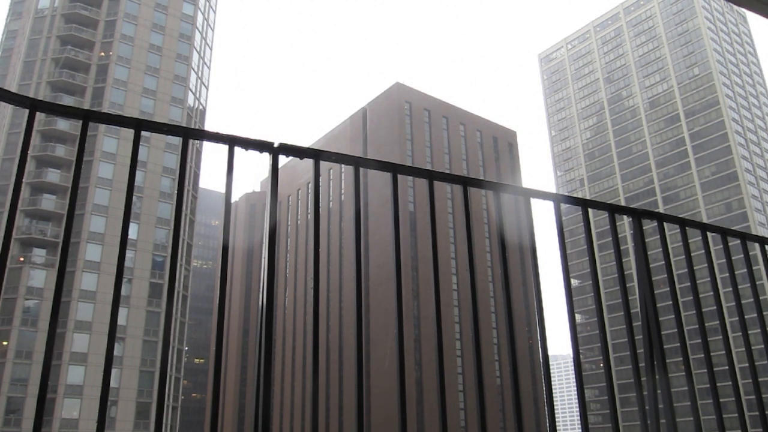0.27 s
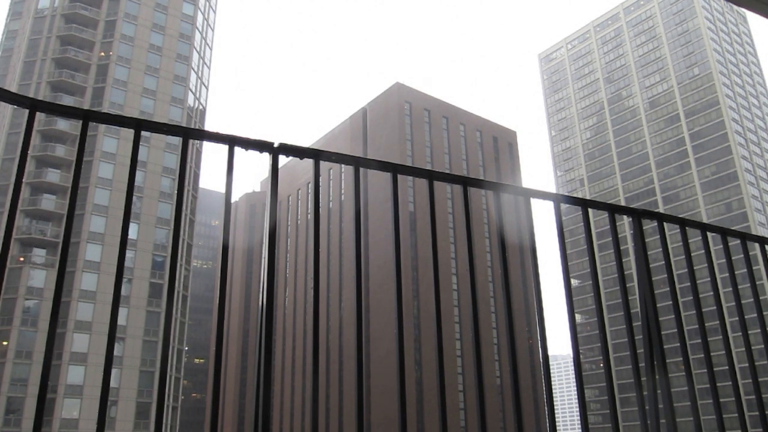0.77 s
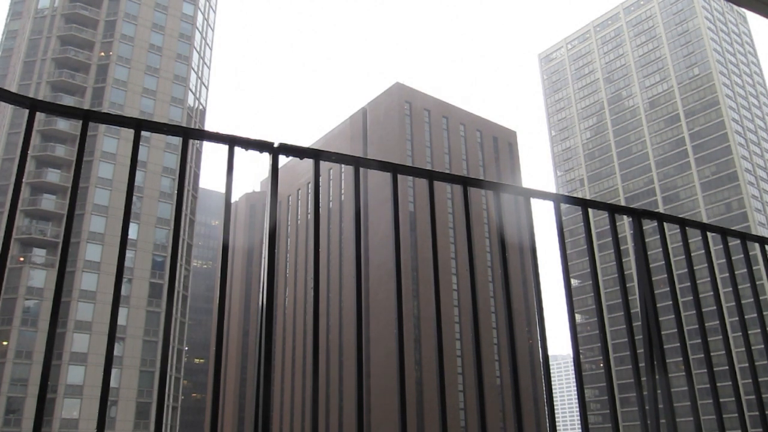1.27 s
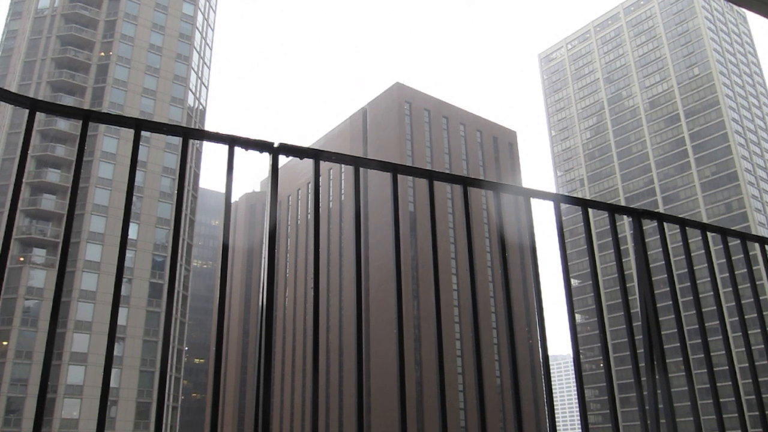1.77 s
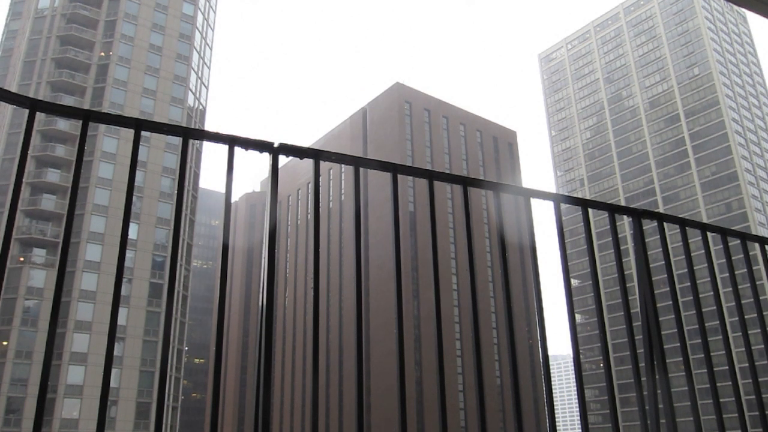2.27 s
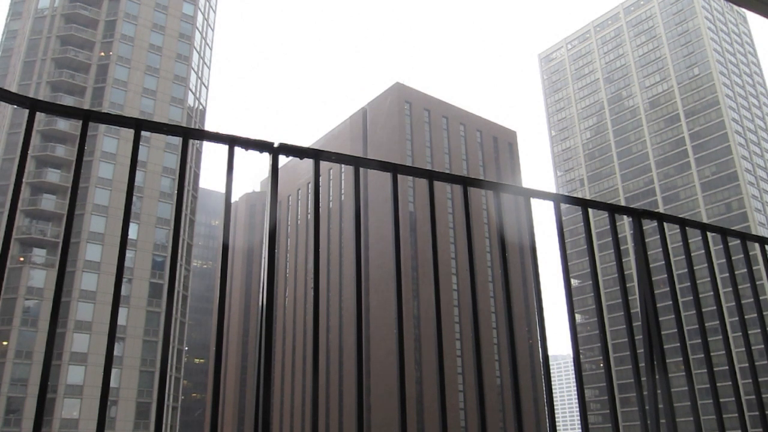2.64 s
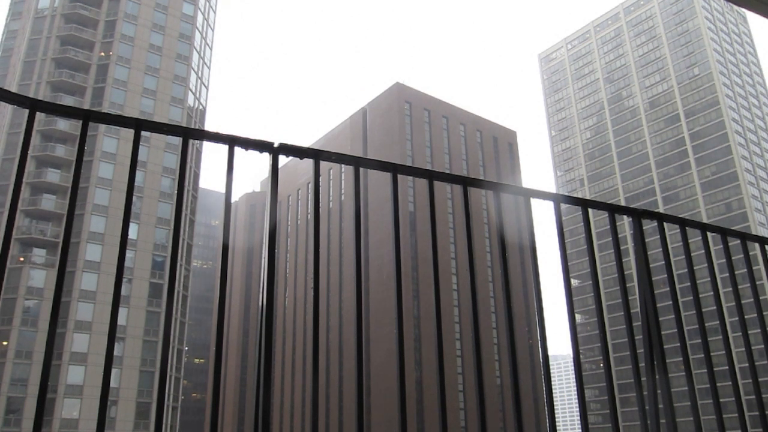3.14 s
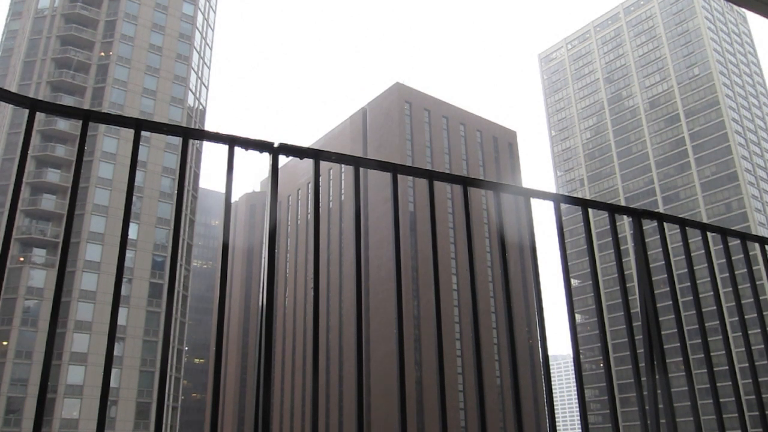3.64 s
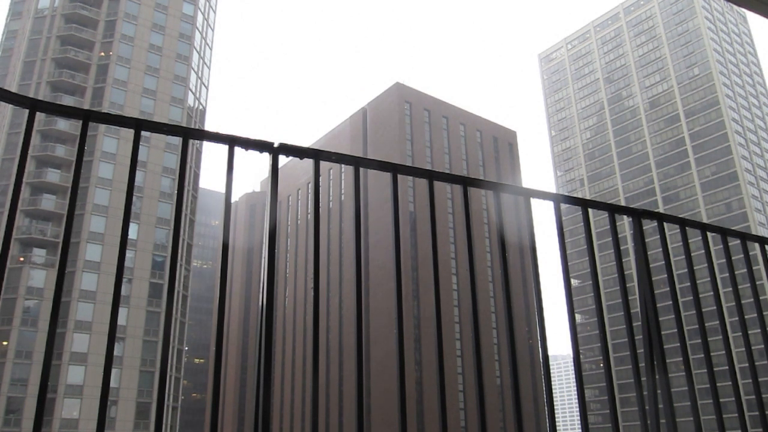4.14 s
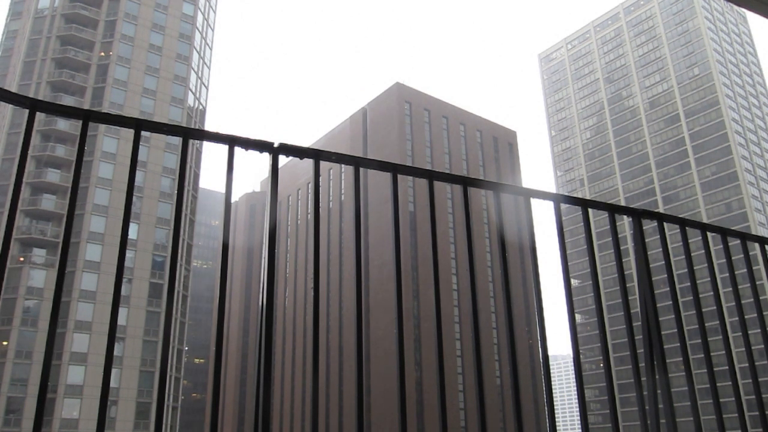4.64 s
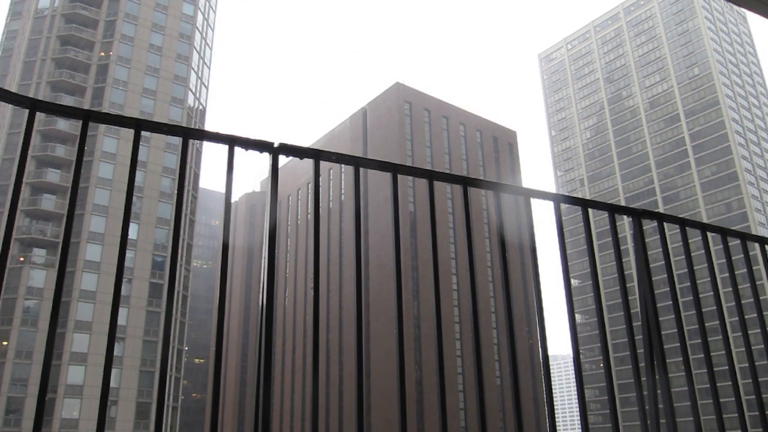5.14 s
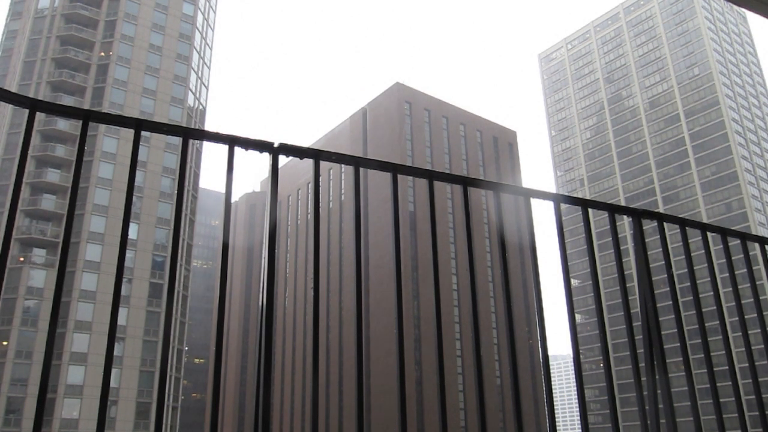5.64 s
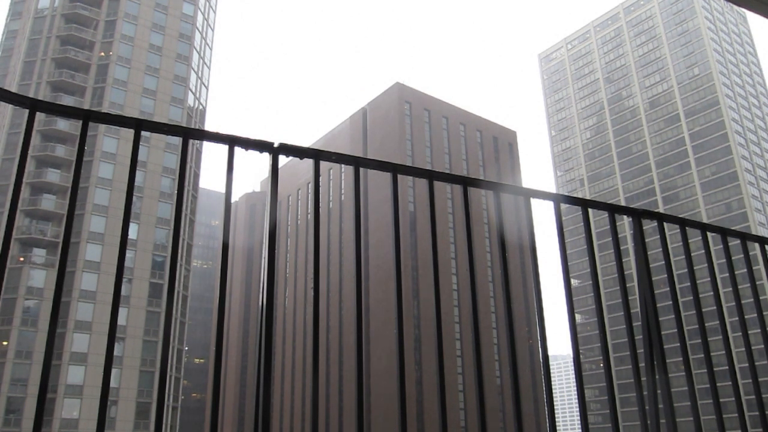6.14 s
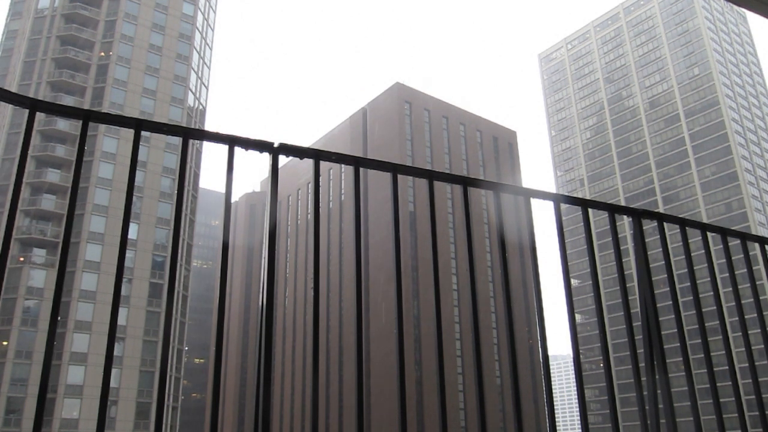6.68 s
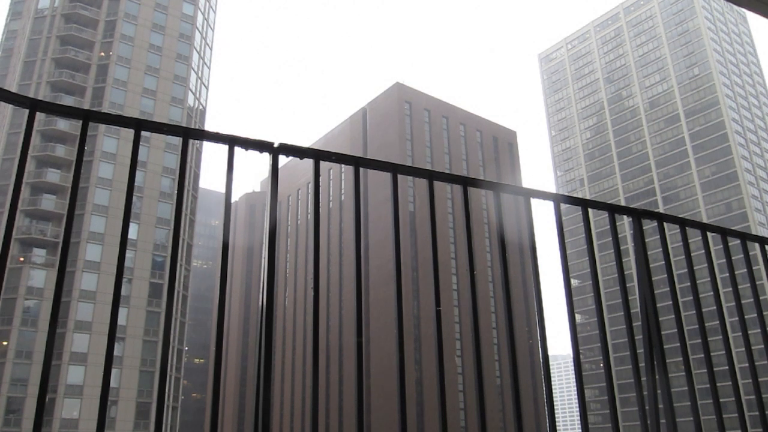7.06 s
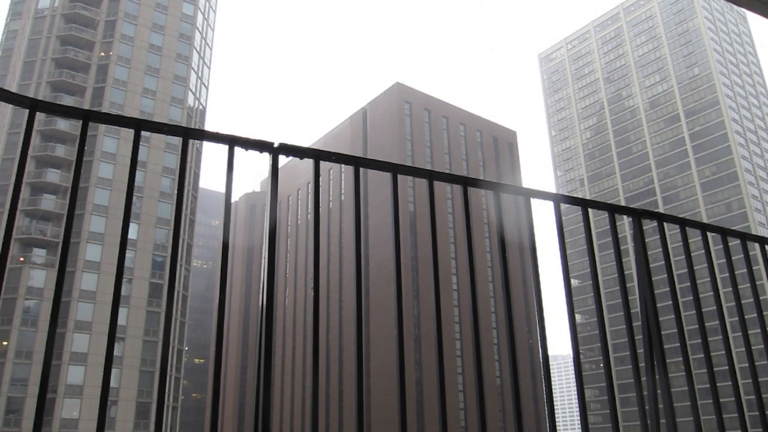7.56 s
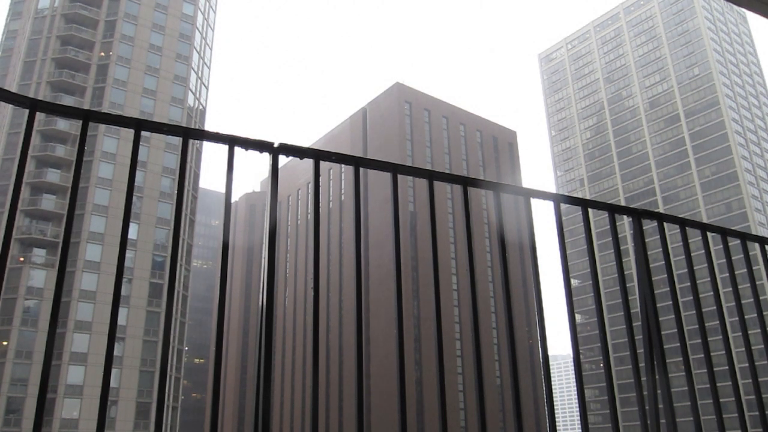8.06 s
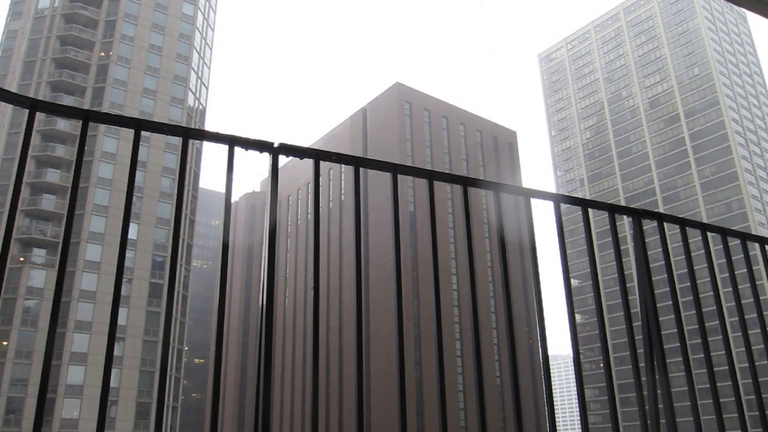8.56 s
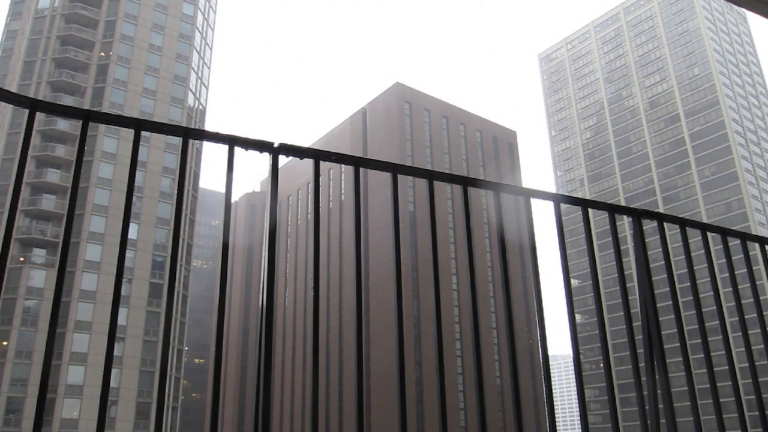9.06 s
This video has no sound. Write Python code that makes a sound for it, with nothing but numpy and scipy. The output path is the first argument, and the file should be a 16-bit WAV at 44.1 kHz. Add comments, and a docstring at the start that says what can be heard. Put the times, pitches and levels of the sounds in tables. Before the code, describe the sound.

Crisp raindrops patter near the microphone until sharp nearby thunder tears open, booms off tall facades, fades, and the rain returns.

```python
"""A balcony among towers in steady rain; single drops tick close to the camera's two microphones.
Lightning strikes nearby: dense trains of shocks make a clap, then a long roll repeated by the facades,
its crackle duller as farther parts of the bolt arrive. Behind it lie filtered-noise traffic, a wash of clicks
for far drops, a fan, thin squeals and air brushing the microphones.
The camera's gain control pushes the rain down at the clap and lets it back over several seconds."""
import sys
import numpy as np
from scipy import signal
from scipy.fft import rfft, irfft
from scipy.io import wavfile

SR = 44100
rng = np.random.default_rng(int(sys.argv[2]) if len(sys.argv) > 2 else 0)


def log_audio(samples):
    """Write samples as a 16-bit WAV file to the path given in sys.argv[1]."""
    # one column per channel
    frames = np.atleast_2d(samples).T
    # limit to full scale, then quantise
    limited = np.clip(frames, -1, 1)
    pcm = np.round(limited * 32767).astype(np.int16)
    wavfile.write(sys.argv[1], SR, pcm)


N = 411012
TIME, FREQS = np.arange(N) / SR, np.fft.rfftfreq(N, 1 / SR)
SLOW = np.arange(0, N / SR + .002, .002)  # coarse time grid in seconds for slow level curves


def amp(db):
    """Decibels to gain."""
    return 10 ** (np.asarray(db) / 20)


def unit(x):
    """Scales to rms 1."""
    return x / np.sqrt(np.mean(x ** 2) + 1e-20)


def read(points, hz=FREQS):
    """A spectrum read on a log-frequency axis."""
    f, value = np.transpose(points)
    return np.interp(np.log(hz + 1), np.log(f), value)


def add(mix, s, sound):
    """Mixes a sound in at time s."""
    part = mix[:, max(round(s * SR), 0):][:, :sound.shape[-1]]
    part += sound[..., :part.shape[1]]


def drift(rate):
    """Slow chance of rms 1: noise whose spectrum falls steeply above rate in Hz."""
    hz = np.fft.rfftfreq(len(SLOW), SLOW[1])
    spectrum = rfft(rng.standard_normal(len(SLOW))) / (1 + (hz / rate) ** 4)
    return np.interp(TIME, SLOW, unit(irfft(spectrum, len(SLOW))))


def swells(rows):
    """Summed power of bell-shaped swells, each given as (s, half length s, dB)."""
    power = sum(amp(db) ** 2 * np.exp(-((SLOW - s) / half_s) ** 2) for s, half_s, db in rows)
    return np.interp(TIME, SLOW, power)


def clicks(per_s, spread_db):
    """Two random trains of clicks, most small and a few large."""
    size = amp(spread_db * np.minimum(rng.exponential(1, (2, N)), 4))
    sign = rng.choice([-1, 1], (2, N))
    return unit(size * sign * (rng.random((2, N)) < per_s / SR))


def colour(pair, gain, likeness):
    """Filters two unrelated signals and blends them into left and right."""
    common, apart = rfft(pair) * gain
    same = np.clip(read(likeness), -1, 1)
    mid = common * np.sqrt((1 + same) / 2)
    side = apart * np.sqrt((1 - same) / 2)
    return irfft(np.array([mid + side, mid - side]), N)


# How alike the thunder reaches the two microphones. Each row: frequency in Hz, left-right likeness.
THUNDER_LIKENESS = [(25, .6), (60, 1), (130, 0.99), (290, 0.99), (640, 0.92), (1400, 0.7), (3100, 0.14),
                    (6800, 0.11)]


def shocks(level_db, spectrum, per_s, spread_db):
    """Each kink of the bolt sends one shock; they arrive as a dense random train."""
    train = clicks(per_s, spread_db) * amp(level_db)
    return colour(train, unit(amp(read(spectrum))), THUNDER_LIKENESS)


STRIKE_S = 2.415  # the first shock arrives
# Peals, where a whole branch of the bolt is heard together. Each row: centre in seconds,
# half length in seconds, level in dB in the register of like brightness, brightness (0 boom, 0.5 roar, 1.5 crackle).
PEALS = [(2.661, 0.024, -1, 0.25), (2.74, 0.035, 1, 0.63), (2.803, 0.019, 2, 0.47),
         (2.918, 0.049, 3.5, 0.27), (3.166, 0.026, 3, 0.38), (3.3, 0.029, 3, 0.26),
         (3.383, 0.041, 4.5, 0.46), (3.675, 0.029, 3.5, 0.35), (3.852, 0.063, -1, 0.44),
         (4.024, 0.026, 5, 0.61), (4.28, 0.024, 1, 0.37), (4.553, 0.046, -12, 0.64),
         (4.674, .03, -1.5, 0.34), (4.787, 0.028, 1.5, 0.22), (5.896, 0.025, -2, 0.27),
         (6.066, 0.018, -5, 0), (6.18, 0.34, -9.5, 0.81), (8.926, 0.14, -20, 0.84),
         (9.117, 0.12, -10, 0.35), (9.31, 0.053, -11.5, 0.32)]


def roll_db(full_db, fade_db_per_s, far_db, brightness):
    """Level of one register: more of the bolt is heard, it holds, fades to far echoes; peals add to it."""
    build_s, build_power, hold_s = 0.59, 1.71, 1.64
    focus_db = 68.5  # a peal loses this in a register one whole step of brightness away
    age = TIME - STRIKE_S
    build = np.clip(age / build_s, 0, 1) ** build_power
    body = amp(full_db - fade_db_per_s * np.maximum(age - build_s - hold_s, 0))
    peals = swells([(s, half_s, db - focus_db * (bright - brightness) ** 2)
                    for s, half_s, db, bright in PEALS])
    return 10 * np.log10(build ** 2 * (body ** 2 + amp(far_db) ** 2) + peals + 1e-12)


# The three registers of the shocks. Each row: frequency in Hz, relative level in dB.
BOOM = [(20, -39), (45, -12), (62, -9.5), (85, 0.5), (150, -0.5), (200, -7), (330, -15.5), (700, -88)]
ROAR = [(60, -58), (140, -5.5), (200, 0.5), (275, 2), (460, -2), (620, -11.5), (850, -18), (2000, -32),
        (4000, -99)]
CRACKLE = [(250, -29), (550, 5), (800, -1), (1100, -0.5), (1550, -3), (2200, -3), (3500, -7), (5500, -14.5),
           (8000, -26), (16000, -49)]
# Echoes from the towers' facades. Each row: delay in seconds, level in dB against the direct roll.
FACADES = [(.047, -10.5), (0.117, -9), (.205, -27), (.34, -18.5)]


def thunder():
    """Boom, roar and crackle repeated by the towers; crossing more air dulls the later crackle, up to a limit."""
    boom_db = roll_db(full_db=-6.5, fade_db_per_s=5.5, far_db=-26, brightness=0)
    roar_db = roll_db(full_db=-2.5, fade_db_per_s=5.5, far_db=-24.5, brightness=.5)
    crackle_db = roll_db(full_db=-4.5, fade_db_per_s=5.5, far_db=-53, brightness=1.5)
    boom = shocks(boom_db, BOOM, per_s=500, spread_db=2.0)
    roar = shocks(roar_db, ROAR, per_s=1100, spread_db=1.5)
    crackle = shocks(crackle_db + 1.25 * drift(21), CRACKLE, per_s=4000, spread_db=2.0)

    air_from_s, air_settle_s = 2.51, 3.23
    air_loss_db, air_at_hz = 26.5, 3460  # the final loss, at this frequency
    hz, t, z = signal.stft(crackle, SR, nperseg=512)
    far = 1 - np.exp(-(np.maximum(t, STRIKE_S) - air_from_s) / air_settle_s)
    loss_db = air_loss_db * far * (hz[:, None] / air_at_hz) ** 1.155
    dulled = signal.istft(z * amp(-loss_db), SR, nperseg=512)[1][:, :N]

    direct = boom + roar + dulled
    out = direct.copy()
    for delay, db in FACADES:
        add(out, delay, amp(db) * direct)
    return out


# Single heavy shocks felt as low thumps. Each row: start in seconds, peak in dB, pitch in Hz.
THUMPS = [(2.529, -8, 66.6), (2.559, -5.5, 145), (2.593, -1.5, 125), (3.152, 7, 105), (3.275, 1, 85),
          (3.312, 5, 170)]


def thumps(cycles_to_peak=0.75):
    """A heavy shock swells within one swing and dies in a few more."""
    out, t = np.zeros((2, N)), np.arange(6000) / SR
    for s, db, hz in THUMPS:
        age = t * hz / cycles_to_peak
        swell = (age * np.exp(1 - age)) ** 2
        add(out, s, amp(db) * swell * np.sin(2 * np.pi * hz * t))
    return out


# Stretches of the bolt whose shocks arrive all at once. Each row: centre in seconds, level in dB,
# centre frequency in Hz, half width in natural-log frequency, half length in seconds.
CRACKS = [(2.57, -20, 1700, .5, 0.0055), (2.598, -12.5, 1650, 0.56, 0.008),
          (2.621, -13, 1940, 0.73, 0.0075), (2.641, -14.5, 1840, 0.5, 0.0086),
          (2.659, -3, 390, 0.35, 0.011), (2.675, -16, 2500, 0.55, .024), (2.702, -5, 1390, 0.58, .008),
          (2.725, -3.5, 2300, 0.59, 0.0065), (2.731, 3.5, 480, 0.21, 0.0083),
          (2.737, -4.5, 2190, 0.57, 0.0055), (2.76, -10, 1900, 0.42, .004),
          (2.785, -9.5, 2200, 0.6, 0.0073), (2.803, 2, 370, 0.28, .009), (2.849, -2, 497, 0.19, .007),
          (2.887, -1, 417, 0.31, .012), (3.397, -6, 1070, 0.28, 0.012), (3.411, 3.5, 420, 0.33, 0.0068),
          (3.977, 2, 230, 0.24, 0.0082), (4.848, -2, 930, 0.24, .012), (8.835, -10.5, 338, 0.34, .012),
          (9.044, -5, 335, .2, .011)]


def cracks(per_s=2000, fizz=0.47, air_hz=6600):
    """Tight volleys of separate shocks tear out of the roll, each in its own band under a bell."""
    out = np.zeros((2, N))
    air = signal.butter(4, air_hz, fs=SR, output="sos")
    for s, db, hz, width, half_s in CRACKS:
        t = np.arange(-3 * half_s, 3 * half_s, 1 / SR)
        fronts = rng.standard_normal(len(t)) * (rng.random(len(t)) < per_s / SR)
        volley = unit(fronts) + fizz * rng.laplace(size=(2, len(t)))
        edges = [hz * np.exp(-width), hz * np.exp(width)]
        band = signal.butter(2, edges, "band", fs=SR, output="sos")
        bell = np.exp(-(t / half_s) ** 2 / 2)
        burst = unit(signal.sosfilt(np.vstack([band, air]), volley) * bell)
        add(out, s - 3 * half_s, amp(db) * burst * np.sqrt(np.mean(bell ** 2)))
    return out


def tick(hz, cycles=0.35, rattle_db=-13, rattle_s=0.0021, bounce=0.49):
    """A drop's impact: a brief swing that reaches one microphone first, then a moment of wet rattle."""
    lag = rng.uniform(-0.000098, 0.0001)  # seconds between the microphones
    t = np.arange(320) / SR - .0003
    since = np.maximum(t + np.array([[lag], [-lag]]) / 2, 0)
    age = since * hz / cycles
    impact = age * np.exp(1 - age) * np.sin(2 * np.pi * cycles * age)
    # a slightly later bounce off the wet surface gives each drop its own colour
    impact = impact + bounce * np.roll(impact, round(rng.uniform(1, 2.6) * SR / hz), axis=1)
    rattle_edges = np.clip([hz * 0.92, hz * 2.8], 500, SR * .45)
    band = signal.butter(1, rattle_edges, "band", fs=SR, output="sos")
    rattle = unit(signal.sosfilt(band, rng.standard_normal(age.shape)))
    rattle = rattle * (1 - np.exp(-age)) * np.exp(-since / rattle_s)
    # small drops have no body, big soft ones little edge
    thin_edges = np.clip([hz * 0.4, hz * 4.2], 1500, SR * .47)
    thin = signal.butter(2, thin_edges, "band", fs=SR, output="sos")
    return signal.sosfilt(thin, impact + amp(rattle_db) * rattle)


def drop(hz, splash_db, splash_s=0.0072, body_db=-21, body_s=0.0011, count=7):
    """A big drop ticks and briefly rings the spot it hits; the droplets it throws land just after, weaker with delay."""
    out, t = np.zeros((2, 4096)), np.arange(1024) / SR
    add(out, 0, tick(hz))
    for pitch, ring in rng.uniform(0.693, 1.21, (2, 2)):
        decay = np.exp(-t / (body_s * ring))
        add(out, 0, amp(body_db) * decay * np.sin(2 * np.pi * hz * pitch * t))
    for delay, scatter, pitch in rng.random((count, 3)):
        droplet = tick(min(hz * (.7 + .9 * pitch), 13000))
        level_db = splash_db - 1.8 * delay - 2.2 * scatter
        add(out, 3 * splash_s * delay ** 1.4, amp(level_db) * droplet)
    return out


# The biggest drops, close by. Each row: start in seconds, level in dB, pitch in Hz,
# splash in dB against the drop.
NEAR_DROPS = [(0.07, -5, 4620, -18), (.3335, -14, 11000, -18), (0.366, 2.5, 9000, -24),
              (.5855, -9, 10500, -16), (0.677, -4.5, 5050, -16), (.8825, -4.5, 7700, -20),
              (1.0893, -4.5, 5900, -20), (1.188, -5, 7700, -21), (1.265, -8, 10000, -18),
              (1.562, -9.5, 4270, -16), (1.61, -4, 11500, -16), (1.6803, -1.5, 9500, -18),
              (1.7445, -8, 6500, -12), (1.7555, -8.5, 4670, -17), (1.833, -6.5, 5600, -20),
              (1.843, -5, 6900, -18), (2.0285, -10, 11000, -18), (2.044, -9, 6450, -15),
              (2.1097, -2, 5500, -13), (2.1552, -1.5, 6900, -19), (2.209, -8, 10500, -18),
              (2.224, -6, 9900, -18), (2.249, 3, 7700, -22), (2.331, -4.5, 5500, -21),
              (2.3562, -7, 6030, -20), (2.429, -6, 9550, -16), (2.443, 0, 10100, -16),
              (2.526, -8, 5970, -12), (2.6161, 3, 12700, -14), (3.1906, -5, 11000, -20),
              (4.1255, -2, 11000, -18), (4.801, 0, 12000, -22), (4.908, -2, 10500, -15),
              (5.0056, 1, 11000, -18), (5.0206, 0.5, 5800, -8), (5.143, -10, 8500, -18),
              (5.291, -1.5, 5500, -9), (5.4125, -5, 12500, -22), (5.461, -3, 6500, -12),
              (5.508, -6, 12500, -20), (5.5243, -2.5, 4627, -18), (5.6805, -13, 12500, -20),
              (5.761, -2, 6700, -16), (5.9135, -12, 10000, -18), (5.936, -5, 6000, -16),
              (5.9777, 2, 3400, -17), (6.0004, -2, 4200, -18), (6.0084, 2.5, 5200, -17),
              (6.209, -2, 8100, -17), (6.32, -9, 4400, -15), (6.493, -1, 8870, -18), (6.5976, 4, 9980, -19),
              (6.6499, -2, 10500, -18), (6.661, 2, 4030, -20), (6.7606, -1.5, 9000, -16),
              (6.796, -2, 5850, -6), (6.8262, -0.5, 6280, -9), (6.8736, 3, 6560, -19),
              (6.9234, 1, 10000, -18), (6.931, 0, 4140, -11), (6.9405, -1, 3700, -12),
              (6.9537, 0, 4400, -12), (6.97, -1, 8600, -18), (7.016, 1, 11000, -22),
              (7.048, -7, 10500, -14), (7.1237, 0.5, 7200, -19), (7.167, -4, 9000, -18),
              (7.1723, 2, 7840, -18), (7.2121, -4.5, 5050, -18), (7.263, -4.5, 5200, -13),
              (7.332, -7, 12000, -19), (7.4083, -2, 4630, -18), (7.4518, -8, 6000, -18),
              (7.655, -2, 11000, -16), (7.676, -11, 4600, -10), (8.0133, -2, 5500, -16),
              (8.128, -10, 10000, -18), (8.151, -6, 7500, -19), (8.551, -10.5, 9000, -18),
              (8.657, -1.5, 7660, -22), (9.148, -5, 9000, -18), (9.266, -9, 8050, -18)]


def near_hits():
    """Big drops landing beside the camera."""
    out = np.zeros((2, N))
    for s, db, hz, splash_db in NEAR_DROPS:
        add(out, s, amp(db) * drop(hz, splash_db))
    return out


# Gusts throw spray onto the balcony. Each row: centre in seconds, half length in seconds, added patter in dB.
GUSTS = [(.52, 0.14, -34), (1.25, 0.089, -44), (1.72, 0.12, -31), (2.2, 0.17, -36), (2.54, 0.013, -27),
         (5.2, 0.5, -40), (6.1, 0.43, -31.5), (6.95, 0.21, -29), (8.2, 0.19, -45)]


def patter(count=90, steady_db=-39):
    """Small drops of many pitches on the rail and floor, coming in clumps and gusts."""
    clumps = amp(2 * drift(14))
    hits = clicks(400, 2.7)[0] * clumps
    kind = rng.integers(0, count, N)
    shapes = [tick(hz) * np.sqrt(hz) for hz in np.geomspace(4800, 12000, count)]
    out = np.zeros((2, N))
    for at in np.flatnonzero(hits):
        add(out, at / SR, hits[at] * shapes[kind[at]])
    return unit(out) * np.sqrt(amp(steady_db) ** 2 + swells(GUSTS))


def slap(x, delay_s=.0098, slap_db=-10, smear_s=.0009):
    """The balcony's ceiling returns every drop once, a little smeared."""
    t = np.arange(200) / SR
    smear = rng.standard_normal((2, len(t))) * np.exp(-t / smear_s)
    smear = smear / np.linalg.norm(smear, axis=1, keepdims=True)
    out = x.copy()
    add(out, delay_s, amp(slap_db) * signal.oaconvolve(x, smear, axes=1))
    return out


def balcony(x, wet_db=-11, fade_s=0.0083):
    """Floor, wall and ceiling smear each drop into a short hiss: noise that follows the drops' power."""
    r = np.exp(-1 / (fade_s * SR))
    power = signal.lfilter([1 - r], [1, -r], (x ** 2).mean(0))
    band = signal.butter(2, [3200, 12500], "band", fs=SR, output="sos")
    hiss = unit(signal.sosfilt(band, rng.standard_normal((2, N))))
    return x + amp(wet_db) * np.sqrt(power) * hiss


# Soft knocks on the camera. Each row: time in seconds, level of the push in dB.
KNOCKS = [(0.156, -4.5), (.434, -8)]


def knocks():
    """Each dull knock pushes the camera's body once; it swings back and rings briefly."""
    out, t = np.zeros((2, N)), np.arange(-256, 3000) / SR
    push = np.exp(-(t / .0008) ** 2) - .5 * np.exp(-((t - .0018) / .0012) ** 2)
    ring = 0.15 * (t > 0) * np.exp(-t / 0.02) * np.sin(2 * np.pi * 250 * t)
    for s, db in KNOCKS:
        add(out, s + t[0], amp(db) * (push + ring))
    return out


# City drone and rain wash beyond the balcony. Each row: frequency in Hz, dB per Hz before the level moves.
CITY = [(10, -55), (22, -62), (50, -50), (80, -43.5), (150, -48.5), (200, -49), (280, -51), (450, -60),
        (700, -68.5), (1500, -66.5), (5000, -100)]
WASH = [(200, -55.5), (600, -64), (1100, -68.5), (2300, -68.5), (3500, -70), (6500, -76), (10500, -77),
        (13000, -85), (16000, -113)]
# Level of city and wash, dipping briefly near the start. Each row: time in seconds, level in dB.
STREET_LEVEL = [(0, 1.5), (.14, 1), (.27, -0.5), (.41, -4.5), (.65, -1.5), (1.6, 0), (9.3, -2.5)]
# How alike they reach the two microphones. Each row: frequency in Hz, left-right likeness.
STREET_LIKENESS = [(25, 0.42), (60, 1), (130, 0.98), (290, 0.95), (640, 0.88), (1400, 0.69),
                   (3100, -0.0084), (6800, -0.5), (15000, 0.28)]


def street():
    """Traffic drone as noise, the wash of countless far drops as clicks, and a throbbing fan as a sine."""
    level_db = np.interp(TIME, *np.transpose(STREET_LEVEL))
    per_hz = np.sqrt(SR / 2)  # turns dB per Hz into filter gain
    city = colour(rng.standard_normal((2, N)), per_hz * amp(read(CITY)), STREET_LIKENESS)
    city = city * amp(level_db - 3)
    wash = colour(clicks(14000, 3.5), per_hz * amp(read(WASH)), STREET_LIKENESS)
    wash = wash * amp(level_db + 0.65 * drift(23.0))

    fan_hz, fan_db = 37.5, -32.5  # a big ventilation fan, mean level as rms
    ports = np.array([[.25], [-.25]])  # its standing wave meets the two microphones slightly out of step
    fan_level = amp(fan_db + 1.1 * drift(3))
    fan = fan_level * np.sin(2 * np.pi * fan_hz * TIME + 0.23 * drift(2.5) + ports)
    return city + wash + np.sqrt(2) * fan


# Thin distant squeals, perhaps brakes. Each row: centre in seconds, half length in seconds,
# mean pitch in Hz, level in dB rms before the flutter.
SQUEALS = [(8.88, .04, 2172, -47), (9.08, .065, 2185, -44), (9.3, .03, 2185, -47.5),
           (8.99, 0.05, 1872, -45), (9.25, .045, 1872, -43.5)]


def squeal(waver=0.003, flutter_db=1.8):
    """Thin wavering tones swell and fade down the street."""
    turn = 2 * np.pi * np.cumsum(1 + waver * drift(14.5)) / SR  # phase of a 1 Hz tone
    out = np.zeros(N)
    for s, half_s, hz, db in SQUEALS:
        level = np.sqrt(2 * swells([(s, half_s, db)])) * amp(flutter_db * drift(25))
        out += level * np.sin(hz * turn)
    return out


# Air brushing each microphone separately. Each row: frequency in Hz, dB per Hz before the flutter.
BREEZE = [(15, -86), (30, -66), (48, -60), (62, -62), (90, -55), (150, -58.5), (400, -86), (2000, -130)]


def breeze():
    """A lumpy low flutter, practically unrelated between the two microphones."""
    gain = np.sqrt(SR / 2) * amp(read(BREEZE))
    flutter = colour(rng.standard_normal((2, N)), gain, [(1, 0.00029)])
    return flutter * amp(1.4 * drift(3.3))


def scene():
    """Everything outdoors, a little stronger on the left, the drops more so."""
    rain = balcony(slap(patter() + near_hits())) * amp([[.3], [-.3]])
    storm = thunder() + thumps() + cracks()
    background = street() + squeal() + breeze()
    return (storm + background + knocks() + rain) * amp([[.4], [-.4]])


def lagged(v, seconds):
    """One-pole smoothing."""
    r = np.exp(-1 / (seconds * SR))
    return signal.lfilter([1 - r], [1, -r], v)


def gain_control(x, threshold_db=-14.5, ratio=10, sense_s=0.021, attack_s=0.0078, recover_db_per_s=4.5):
    """Turns down most of whatever exceeds the threshold, quickly, and recovers slowly."""
    level_db = 10 * np.log10(lagged((x ** 2).mean(0), sense_s) + 1e-12)
    over_db = np.maximum(level_db - threshold_db, 0) * (1 - 1 / ratio)
    recovery = recover_db_per_s * TIME
    # each peak of the reduction is held, then let go at a steady rate
    held_db = np.maximum.accumulate(over_db + recovery) - recovery
    return x * amp(-lagged(held_db, attack_s))


def record(dry):
    """Gain control, the camera's notched and drooping treble, a soft ceiling and the band limit."""
    notch_hz, droop_hz, edge_hz = 8200, 13400, 15950
    notched = signal.lfilter(*signal.iirnotch(notch_hz, 2.7, SR), gain_control(dry))
    dulled = signal.lfilter(*signal.butter(2, droop_hz, fs=SR), notched)
    limited = dulled / (1 + dulled ** 8) ** (1 / 8)
    band_limit = signal.firwin(511, edge_hz, window=("kaiser", 9), fs=SR)
    return signal.oaconvolve(limited, band_limit[None], "same")


dry = scene()
out = record(dry)
log_audio(out)
```